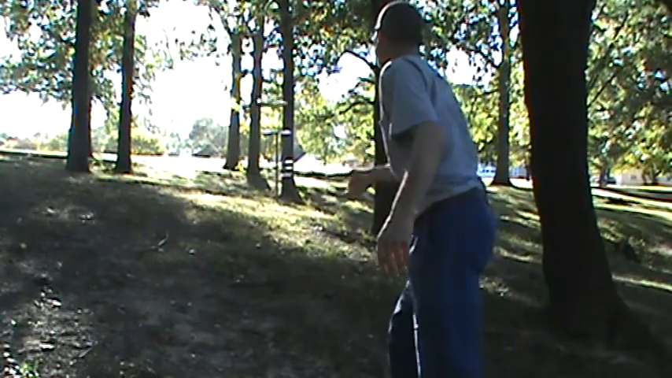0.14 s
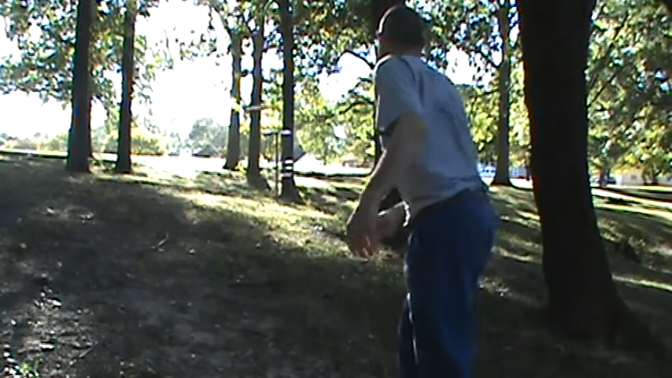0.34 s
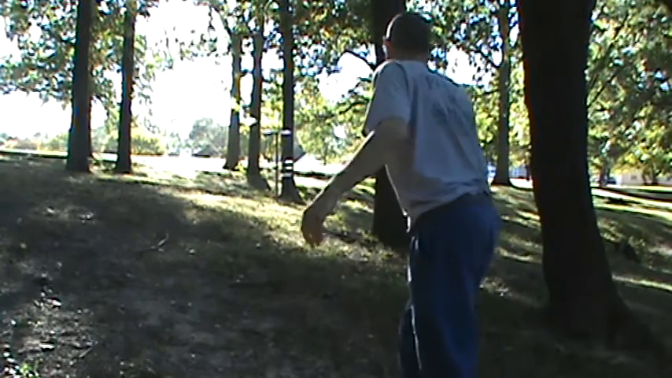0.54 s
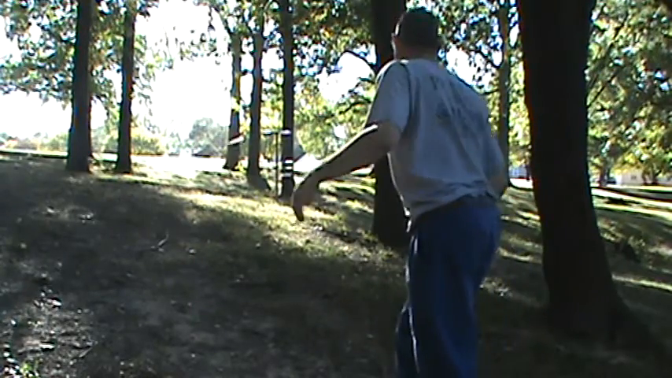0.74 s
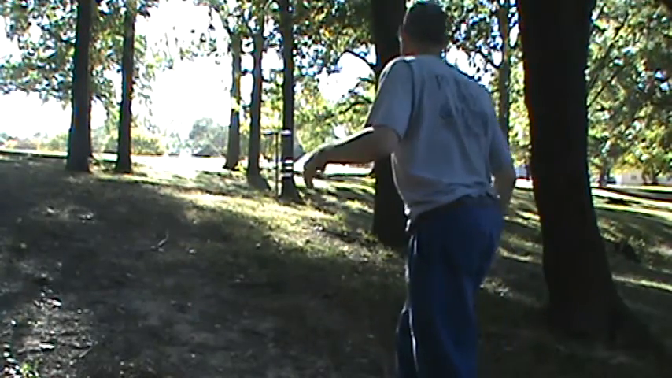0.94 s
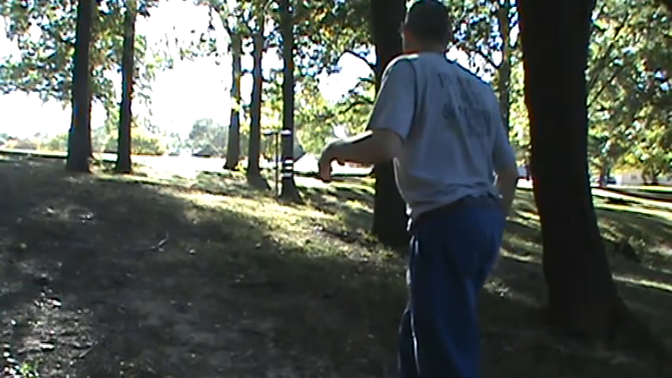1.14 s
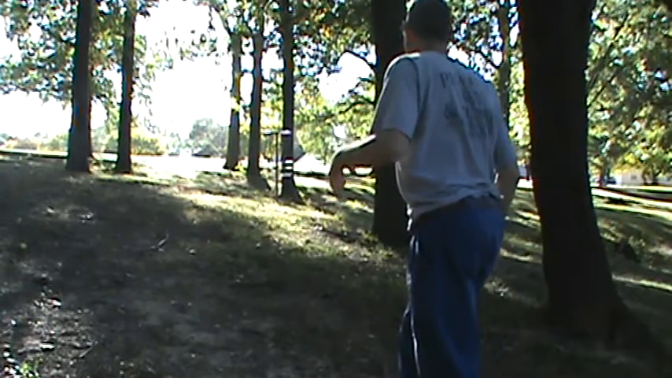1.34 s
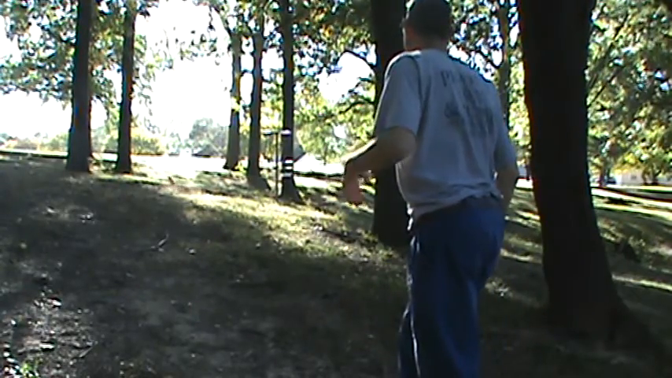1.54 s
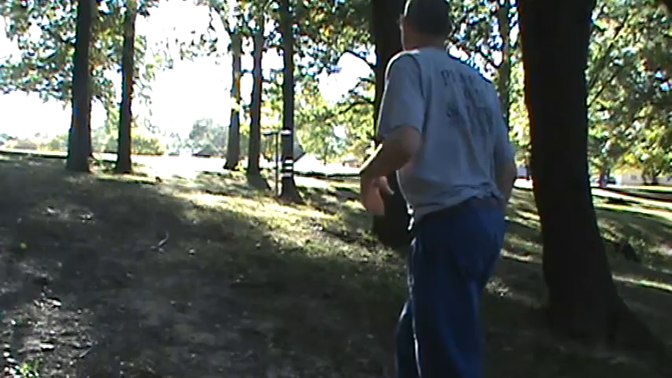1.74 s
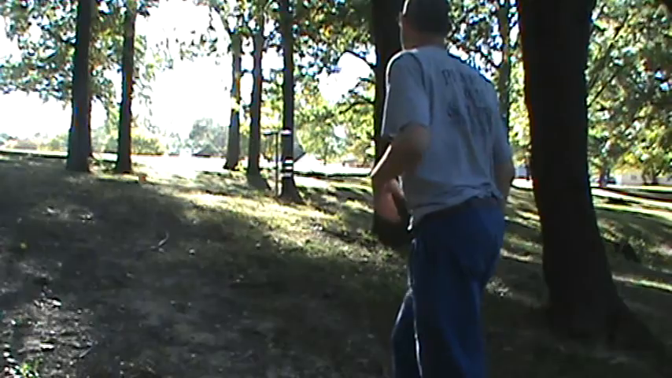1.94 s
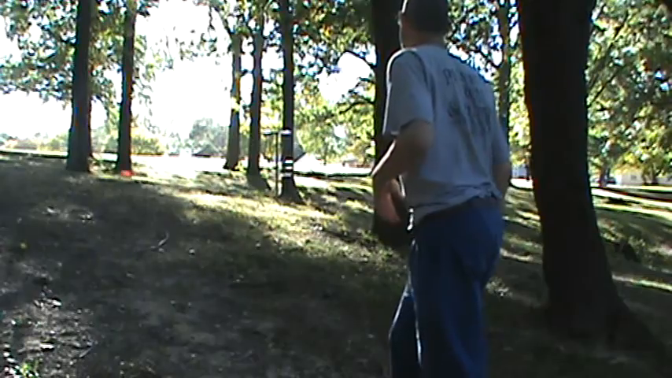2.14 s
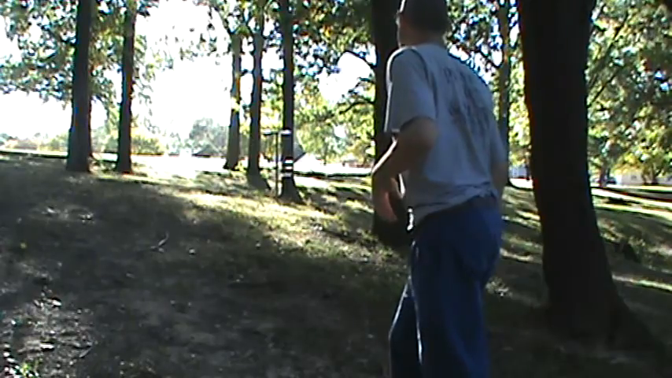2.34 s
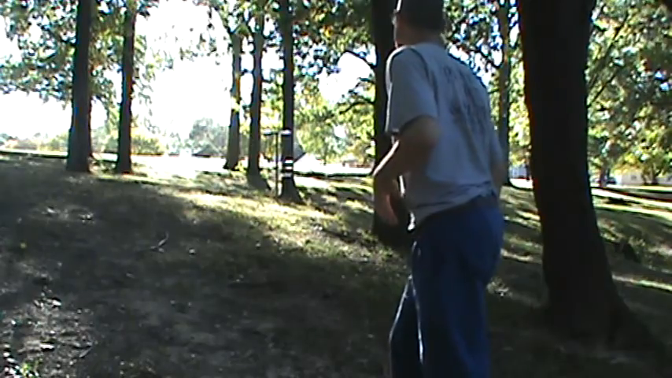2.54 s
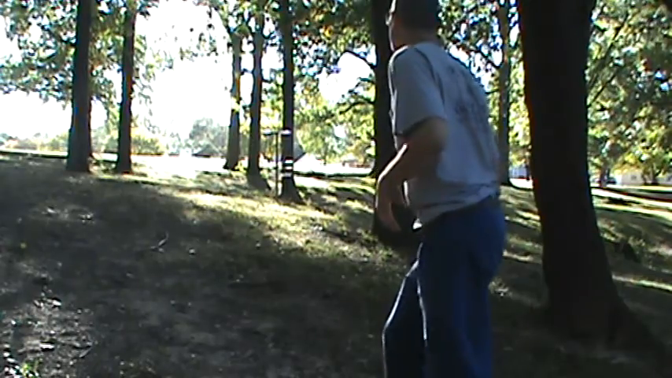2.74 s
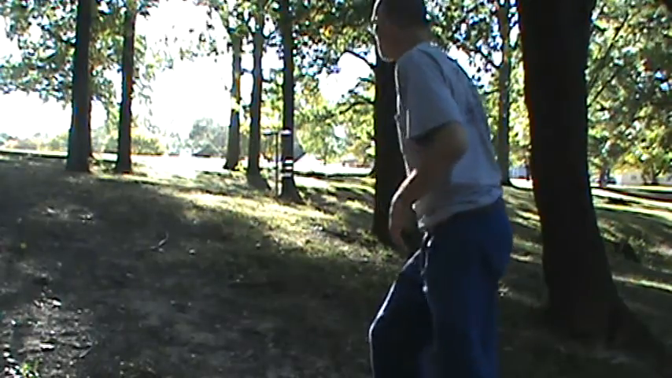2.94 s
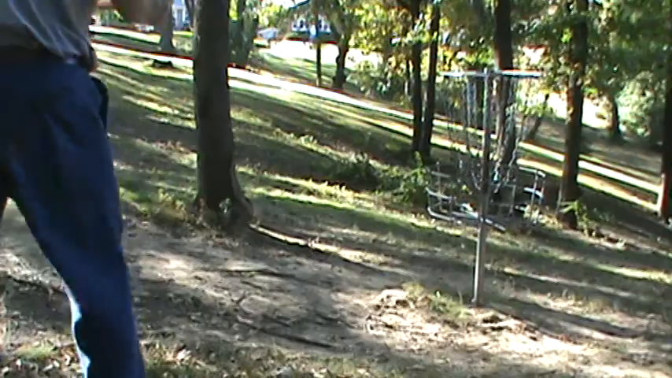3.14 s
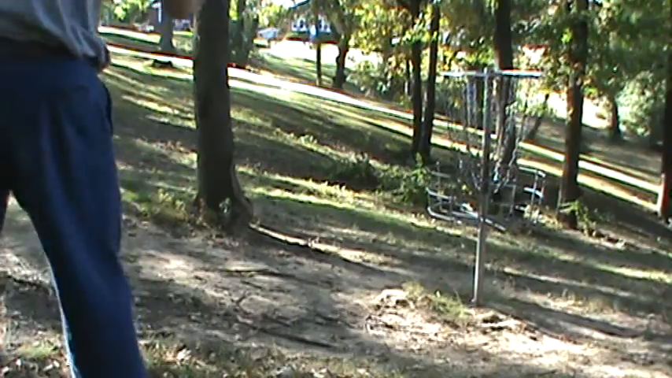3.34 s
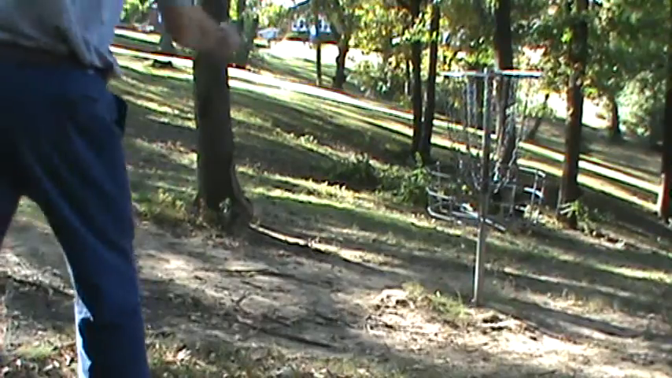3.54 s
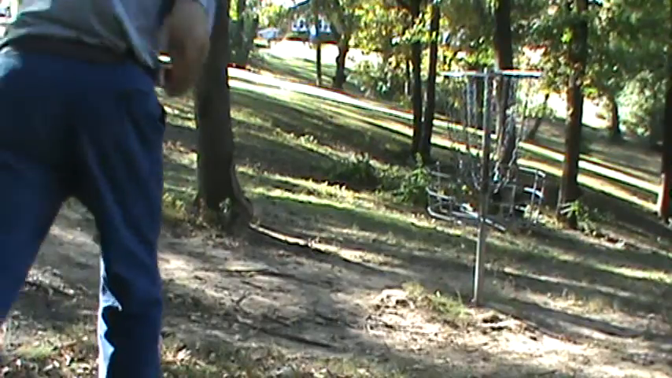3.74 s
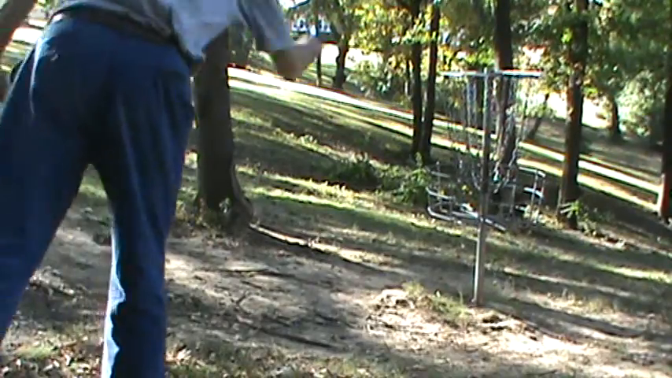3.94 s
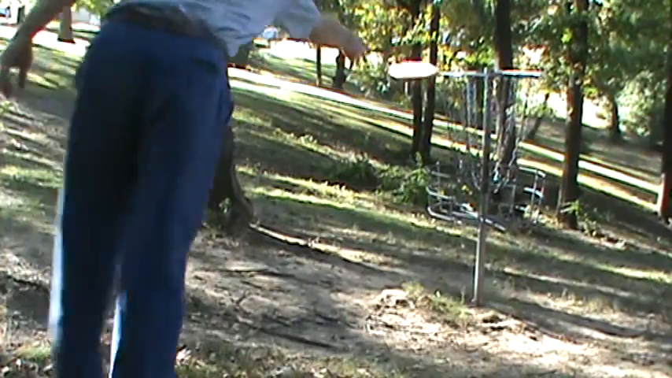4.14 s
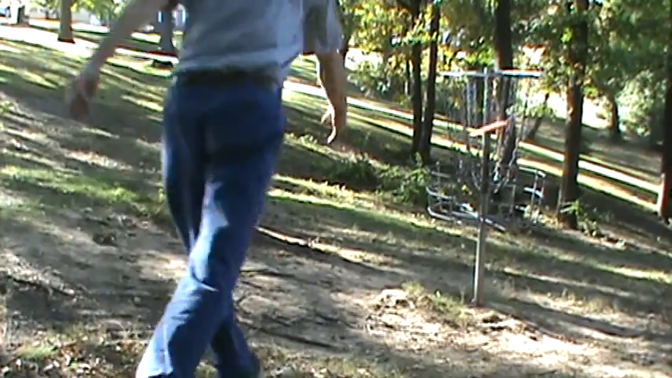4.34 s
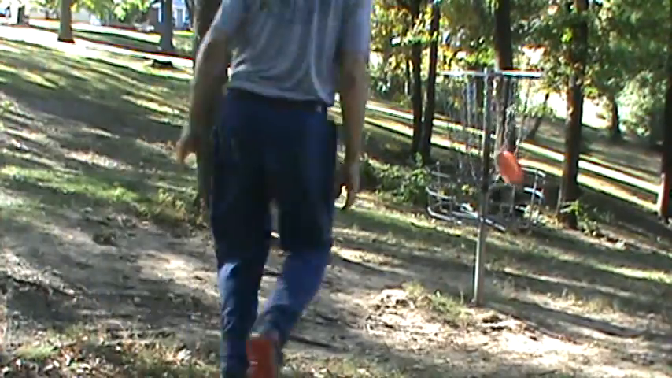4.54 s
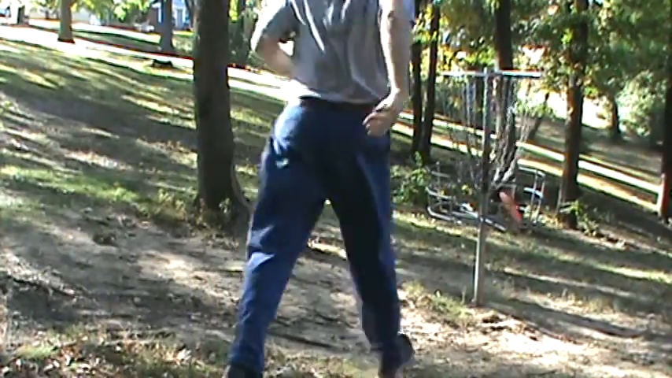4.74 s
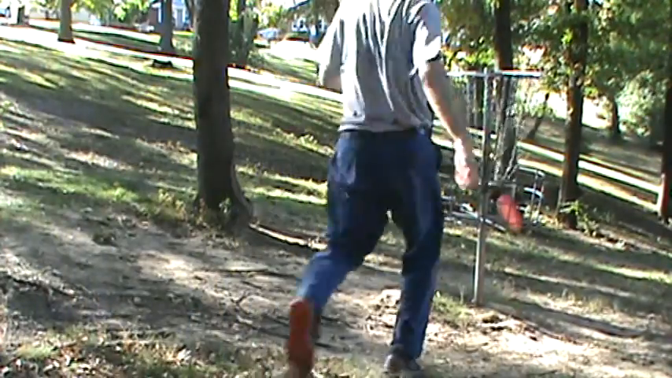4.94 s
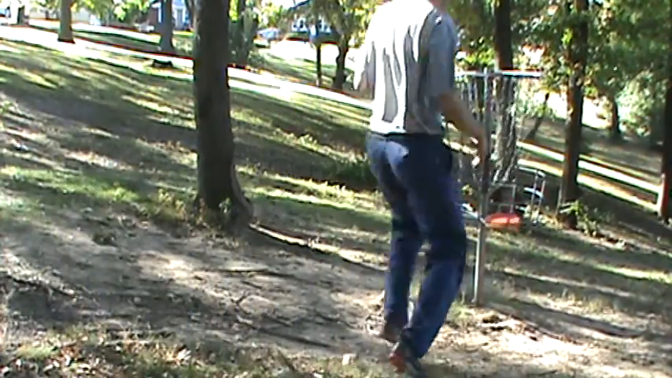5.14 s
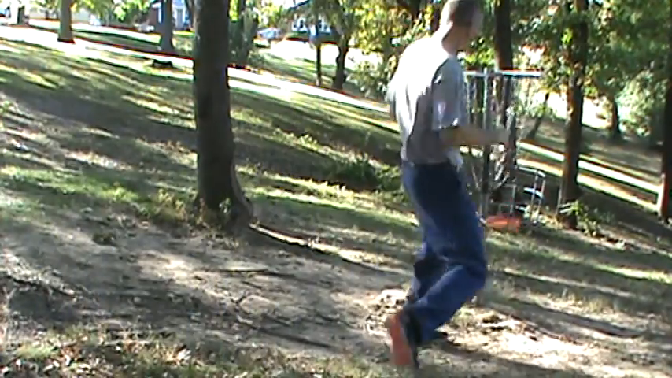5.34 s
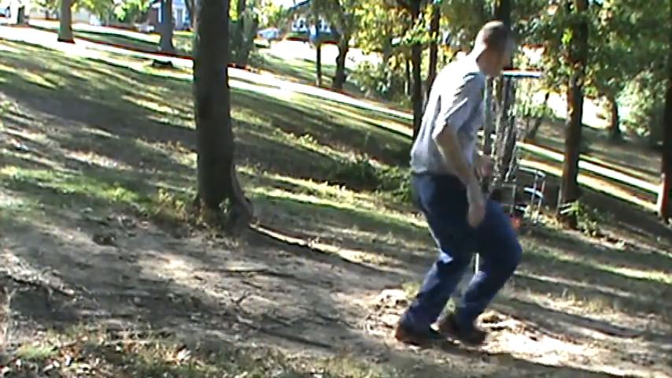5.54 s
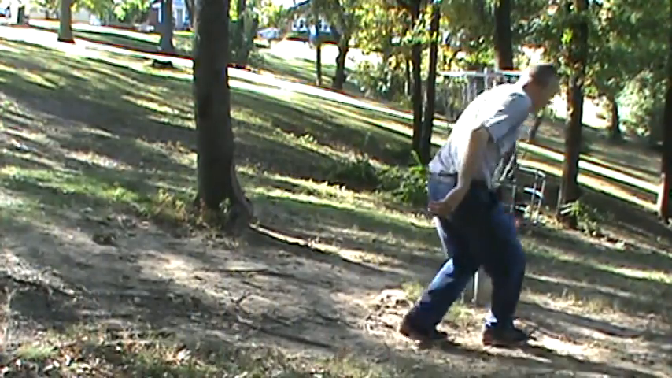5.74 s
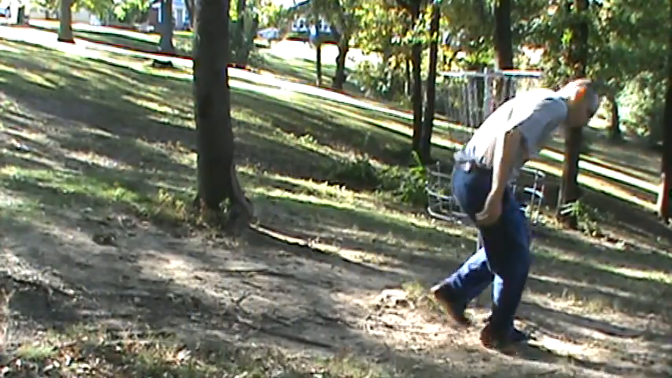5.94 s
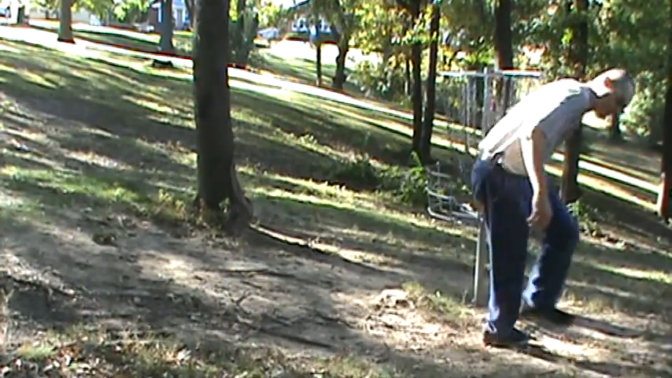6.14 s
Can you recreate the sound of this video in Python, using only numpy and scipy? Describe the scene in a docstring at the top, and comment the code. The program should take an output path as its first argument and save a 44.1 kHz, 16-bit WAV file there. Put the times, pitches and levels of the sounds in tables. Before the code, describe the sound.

Twigs snap sharply and dry leaves scuff under someone's shoes in a wooded park, over a steady distant roar and a faint engine. About halfway, a light breeze starts rumbling on the microphone. A plastic disc then slaps into the steel chains of a disc golf basket, which jangle brightly. The disc knocks a few more times and the swinging chains clink more softly as the footsteps move on.

```python
"""A putt in a wooded park. A distant roar and a far engine run throughout. First twigs snap and dry
leaves scuff under the player's shoes. At 3.1 s the level dips briefly and a breeze starts to rumble on
the microphone. At 4.45 s the disc slaps into the chains of a steel basket: light links tinkle first,
heavy links ring after them. The swinging chains clink a few more times as the player walks on."""
import sys
import numpy as np
from scipy import signal
from scipy.fft import rfft, irfft, next_fast_len
from scipy.io import wavfile

SR = 44100
rng = np.random.default_rng(int(sys.argv[2]) if len(sys.argv) > 2 else 0)


def put_to_file(sound):
    """Save the sound as 16-bit audio at rate SR, in the file named by the first command-line argument."""
    columns = np.atleast_2d(sound).T  # one column per channel
    safe = np.clip(columns, -1, 1)
    whole_steps = np.round(safe * 32767)
    wavfile.write(sys.argv[1], SR, whole_steps.astype(np.int16))


N = 277785
TIME_S = np.arange(N) / SR
DIP_S = 3.108


def gain(db):
    """dB to amplitude."""
    return 10 ** (np.asarray(db) / 20)


def unit_rms(x):
    """Scales to rms 1."""
    return x / np.sqrt(np.mean(x ** 2) + 1e-20)


def curve_at(points, hz):
    """Interpolates (f/Hz, value) rows over log frequency."""
    f, value = np.transpose(points)
    return np.interp(np.log(hz + 1), np.log(f + 1), value)


def add(mix, at_s, sound):
    """Mixes a sound in at at_s."""
    part = mix[max(round(at_s * SR), 0):][:len(sound)]
    part += sound[:len(part)]


def coloured(x, spectrum, tilt_db_oct=0):
    """Filters x by a tilted spectrum; rms 1."""
    size = next_fast_len(len(x))
    hz = np.fft.rfftfreq(size, 1 / SR)
    response = gain(curve_at(spectrum, hz) + tilt_db_oct * np.log2(hz + 1))
    return unit_rms(irfft(rfft(x, size) * response, size)[:len(x)])


def drift(per_s):
    """Slow random wander; rms 1."""
    return unit_rms(np.interp(TIME_S * per_s, np.arange(1000), rng.standard_normal(1000)))


def stereo_noise(spectrum, coherence, balance):
    """Noise with level, L/R coherence and balance set per frequency; rms 1."""
    size = next_fast_len(N)
    hz = np.fft.rfftfreq(size, 1 / SR)
    common, separate = rfft(rng.standard_normal((2, size)))
    shared = np.clip(curve_at(coherence, hz), -1, 1)
    lean_db = curve_at(balance, hz) / 2
    left = common * gain(lean_db)
    right = (shared * common + np.sqrt(1 - shared ** 2) * separate) * gain(-lean_db)
    return unit_rms(irfft(np.array([left, right]) * gain(curve_at(spectrum, hz)), size)[:, :N])


# Roar spectrum: f/Hz, density/dB
ROAR_SPECTRUM = [(15, -40), (25, -8), (113, -1.5), (164, -3.5), (246, -9.5), (281, -6.5), (313, -12),
                 (421, -12), (614, -11.5), (997, -11.5), (3000, -33), (5430, -37.5), (8810, -37.5),
                 (12500, -42), (15500, -41)]
# Roar L/R likeness: f/Hz, coherence
ROAR_COHERENCE = [(60, 1), (130, 1), (290, 0.96), (640, 0.84), (1410, 0.66), (3100, 0.2), (6820, 0.54),
                  (15000, 0.94)]
# Roar balance: f/Hz, L-R/dB
ROAR_LEAN = [(60, 1), (110, 0.5), (200, 0.5), (380, -0.5), (700, -3), (1290, -0.5), (2380, 1.5),
             (4400, -0.5), (8120, 1), (15000, 0.0)]


def roar(level_db=-36):
    """Distant, nearly steady low noise."""
    return gain(level_db + .5 * drift(9)) * stereo_noise(ROAR_SPECTRUM, ROAR_COHERENCE, ROAR_LEAN)


def engine(hz=82.5, level_db=-46):
    """Far engine: one tone, wandering in level and pitch."""
    envelope = gain(level_db + 1.7 * drift(11))
    cycles = np.cumsum(hz + 3 * drift(15)) / SR
    return envelope * unit_rms(np.sin(2 * np.pi * cycles))


# Breeze strength: t/s, level/dB
GUSTS = [(3.13, -33), (3.52, -29), (3.53, -24), (3.78, -29), (3.8, -23), (4.41, -30.5), (4.45, -39),
         (4.66, -26), (4.73, -39), (4.78, -28), (5.52, -32), (5.57, -40), (5.62, -28.5), (5.95, -26),
         (5.98, -32.5), (6.17, -38), (6.29, -24.5)]
# Buffeting spectrum: f/Hz, density/dB
BUFFET_SPECTRUM = [(20, -24), (45, -5.5), (75, -2), (150, -5), (230, -13), (290, -16.5), (380, -27.5),
                   (900, -36), (3000, -54)]


def breeze():
    """Gusts buffet the microphone from DIP_S on."""
    buffet = stereo_noise(BUFFET_SPECTRUM, coherence=[(60, .91), (140, .43), (260, -.3)],
                          balance=[(60, 0), (200, -.3)])
    return (TIME_S > DIP_S) * gain(np.interp(TIME_S, *np.transpose(GUSTS))) * buffet


def woods(x, t60_s=.067, taps_per_s=2000):
    """Trunks and ground scatter a thin, short echo, different on each side."""
    t = np.arange(SR // 2) / SR
    taps = rng.standard_normal((2, len(t))) * (rng.random((2, len(t))) < taps_per_s / SR)
    taps *= gain(-60 * t / t60_s)
    return signal.fftconvolve(x[None], taps / np.linalg.norm(taps[0]), axes=1)[:, :N]


# Spectrum of dry ticks, rustles and cracks: f/Hz, density/dB
CRACK_SPECTRUM = [(300, -17), (1000, -1.5), (2000, -1.5), (4000, -2), (7000, -0.5), (9500, 4.5),
                  (12000, -1), (15500, -11.5)]


def litter(ticks_per_s=22, spread_db=4):
    """Faint stray ticks from the dry ground."""
    onsets = rng.random(N) < ticks_per_s / SR
    sizes = .5 * gain(-40 + spread_db * np.minimum(rng.exponential(1, N), 3))
    t = np.arange(SR // 100) / SR
    tick = coloured(rng.standard_normal(len(t)), CRACK_SPECTRUM) * np.exp(-t / .0012)
    return signal.oaconvolve(onsets * sizes, tick / abs(tick).max())[:N]


# Dry rustling bursts: crest t/s, level/dB, rise/s, release/s, tilt/(dB/oct)
RUSTLE_BURSTS = [(.205, -31.5, 0.0035, 0.044, -0.7), (.318, -36.5, 0.019, 0.048, 1.5),
                 (1.32, -49, 0.088, 0.051, 1), (3.078, -41, .01, 0.014, 12), (3.22, -32, 0.079, .028, -2),
                 (3.461, -44, 0.41, 0.1, -5), (4.192, -38, 0.063, 0.019, -0.5),
                 (4.416, -28.5, 0.075, 0.031, 1.5), (4.495, -33, 0.029, 0.17, 1.3),
                 (4.8, -29, 0.043, 0.067, -2), (4.985, -26.5, 0.072, 0.069, 2),
                 (5.17, -40, 0.028, 0.22, -2.5), (5.355, -38.5, 0.023, 0.12, -5)]


def rustles(cracks_per_s=2500, spread_db=5.5, hiss=.41, roundness=1.17):
    """Swells of tiny cracks over hiss: shoe scuffs in leaves and, at 4.5 s, the chains' clatter."""
    out, t = np.zeros(N), np.arange(-SR // 3, SR // 2) / SR
    for at_s, db, rise_s, release_s, tilt_db_oct in RUSTLE_BURSTS:
        sizes = gain(spread_db * np.minimum(rng.exponential(1, len(t)), 3))
        cracks = sizes * rng.choice([-1, 1], len(t)) * (rng.random(len(t)) < cracks_per_s / SR)
        grain = unit_rms(cracks) + hiss * rng.standard_normal(len(t))
        swell = np.exp(-np.maximum(-t / rise_s, t / release_s) ** roundness)
        burst = gain(db) * swell * coloured(grain, CRACK_SPECTRUM, tilt_db_oct)
        add(out, at_s + t[0], burst[at_s + t >= 0])
    return out


# Feet shift, step into the putt, walk on: start t/s, end t/s
FOOTWORK_SPANS = [(.4, 2.1), (2.999, 4.3), (4.3, 5.45)]


def stalk_snaps(per_span=7, floor_db=-36, spread_db=10, centre_hz=7000, wood_db=-15):
    """Thin stalks break at random as the feet move; rows as in TWIG_SNAPS."""
    rows = []
    for start_s, end_s in FOOTWORK_SPANS:
        for k, (when, size, pitch) in enumerate(rng.random((per_span, 3))):
            at_s = start_s + (end_s - start_s) * (k + when) / per_span
            rows.append((at_s, floor_db + spread_db * size ** 2, centre_hz * 2 ** (pitch - .5), wood_db))
    return rows


# Twigs underfoot: t/s, peak/dB, ring f/Hz, wood knock re ring/dB
TWIG_SNAPS = [(.513, -19, 5500, -14), (0.5265, -4.5, 8500, -15), (.542, -10.5, 7750, -6.5),
              (.804, -27, 8050, -12), (0.871, -13, 7770, -16), (1.228, -16, 5250, -5),
              (1.325, -21, 8500, -24), (1.3556, -13, 8500, -23), (1.6, -15, 8600, -10),
              (3.203, -9.5, 6950, -9), (3.233, -8, 5240, -12), (3.475, -20.5, 3860, -14),
              (3.48, -16.5, 3200, -11), (3.393, -25, 6000, -15), (4, -27, 6200, -15),
              (4.196, -21, 8500, -16), (4.823, -20, 8100, -20), (5.16, -13, 8900, -31),
              (6.065, -22.5, 7100, -14)]


def twigs():
    """A sharp break rings a few cycles and splinters; thick twigs knock, thin ones crumble."""
    out, t = np.zeros(N), np.arange(SR // 30) / SR
    wood = np.sin(2 * np.pi * 1750 * t) * np.exp(-t / .00072)
    wood += .6 * np.sin(2 * np.pi * 4100 * t) * np.exp(-t / .00068)
    for at_s, peak_db, hz, wood_db in TWIG_SNAPS + stalk_snaps():
        ring = np.sin(2 * np.pi * hz * t) * np.exp(-t / .00028)
        burst = .14 * np.exp(-t / .00091)
        crumble = gain(-15 - .82 * (peak_db + 23)) * np.exp(-t / .0028)
        splinters = coloured(rng.standard_normal(len(t)), CRACK_SPECTRUM) * (burst + crumble)
        snap = ring + gain(wood_db) * wood + splinters
        add(out, at_s, gain(peak_db) * snap / abs(snap).max())
    return out


def struck(modes, t, pitch=1):
    """A struck body rings as a sum of damped sines."""
    return sum(gain(db - 60 * t / t60_s) * np.sin(2 * np.pi * hz * pitch * t) for hz, db, t60_s in modes)


# Basket frame modes: f/Hz, level/dB, t60/s
FRAME_MODES = [(790, -5, .09), (860, -2, .1), (960, -3, .09), (5550, -6, .07)]
# Plastic disc modes at pitch ratio 1: f/Hz, level/dB, t60/s
DISC_MODES = [(1067, -21.5, 0.048), (1890, -25, 0.047), (3350, -7, 0.014), (3760, -7.5, 0.019),
              (5550, -29, 0.02), (6250, -26, 0.016)]
# Knocks on pole and tray: t/s, peak/dB, pitch ratio, frame level/dB
DISC_KNOCKS = [(4.449, -5.5, 1.07, -48), (4.5, -29, 0.97, -29.5), (4.542, -35, 0.94, -30.5),
               (4.816, -13.5, 0.95, -40), (4.972, -13, 1.15, -54), (5.159, -18.5, 1.06, -43)]


def disc():
    """Each knock: a dry crack, a short ring of plastic, a hollow answer from the frame."""
    out, t = np.zeros(N), np.arange(SR // 8) / SR
    frame = struck(FRAME_MODES, t)
    for at_s, peak_db, pitch, frame_db in DISC_KNOCKS:
        noise = coloured(rng.standard_normal(len(t)), CRACK_SPECTRUM, tilt_db_oct=1.5)
        knock = struck(DISC_MODES, t, pitch) + .5 * noise * np.exp(-t / .0082)
        add(out, at_s, gain(peak_db) * knock / abs(knock).max() + gain(frame_db) * frame)
    return out


def free_links(modes, t, flurry_s, spread=.0015):
    """Free links ring on; no two are quite alike in pitch, so clashes beat unevenly."""
    hz, db, t60_s = np.transpose(modes)[:, :, None]
    onset, strength, phase = rng.random((3, len(hz), 1))
    link_hz = hz * (1 + spread * rng.uniform(-1.24, 1, hz.shape))
    age_s = t - flurry_s * onset ** 3
    envelope = gain(db + 4 * strength - 60 * np.maximum(age_s, 0) / t60_s) * (age_s > 0)
    return (envelope * np.sin(2 * np.pi * (link_hz * t + phase))).sum(0)


def pinched_links(modes, t, flurry_s, t60_s, detune, contacts=5):
    """Links pinched by neighbours ring mostly sharp and die fast; each rebound is weaker."""
    hz, db, _ = np.transpose(modes)[:, :, None]
    out, t = np.zeros(len(t)), t[:SR // 6]
    for k in range(contacts):
        bend, phase, weight = rng.standard_normal((3, len(hz), 1))
        bent_hz = hz * (1 + detune * (abs(bend) - .3))
        ring = (weight * gain(.8 * db) * np.sin(2 * np.pi * (bent_hz * t + phase))).sum(0)
        add(out, flurry_s * k / (contacts - 1), unit_rms(ring) * gain(-2 * k - 60 * t / t60_s))
    return out


def clash(modes, flurry_s, pinched_db, pinched_t60_s, detune, scrape_db):
    """Links collide over flurry_s and ring; sliding steel adds a rasp. First 25 ms at rms 1."""
    t = np.arange(int(max(t60_s for _, _, t60_s in modes) * SR)) / SR
    head = slice(SR // 40)
    free = free_links(modes, t, flurry_s)
    pinched = pinched_links(modes, t, flurry_s, pinched_t60_s, detune)
    rasp_spectrum = [(1200, -19), (3500, 7), (8500, -1), (11500, 13.5), (15500, -22)]
    scrape = gain(scrape_db) * coloured(rng.standard_normal(len(t)), rasp_spectrum) * np.exp(-t / .068)
    sound = free / free[head].std() + gain(pinched_db) * pinched / pinched[head].std() + scrape
    return sound / sound[head].std()


JANGLE_FLURRY_S, CLINK_FLURRY_S = .008, .004


def jangle(force, count, jitter_s=.002):
    """Rapid clashes as the disc ploughs through the chains; rows of t/s, level/dB."""
    at_s, db = np.transpose(force)
    times_s = np.linspace(at_s[0], at_s[-1], count) + jitter_s * rng.uniform(-.73, 1, count)
    return zip(times_s, np.interp(times_s, at_s, db))


# Light link modes: f/Hz, level/dB, t60/s
LIGHT_LINK_MODES = [(11770, -1, .17), (11881, 0, .21), (11936, -1, .25), (12053, -9, .19), (12234, -14, .2),
                    (12549, -12, .14), (12591, -9, .16), (12661, -8, .17), (12770, -14, .1)]
# Disc force on light chains (start, crest, end): t/s, clash level/dB
LIGHT_FORCE = [(4.453, -20.5), (4.512, -18.5), (4.66, -33.5)]
# Light chains swinging together: t/s, level/dB, rebound delay/s
LIGHT_SWINGS = [(4.702, -24, 0.015), (4.899, -34, 0.038), (5.043, -35, 0.034), (5.185, -35, 0.055),
                (5.251, -35, .028), (5.359, -37, 0.015), (5.503, -49.5, 0.005), (5.663, -38, 0.05),
                (5.945, -51, .005), (6.2, -52, .019)]


def light_chains(rebound_db=-.5):
    """Light links tinkle under the disc, then clink and rebound as they swing."""
    clashes = [(at_s, db, JANGLE_FLURRY_S) for at_s, db in jangle(LIGHT_FORCE, count=13)]
    for at_s, db, delay_s in LIGHT_SWINGS:
        clashes += [(at_s, db, CLINK_FLURRY_S), (at_s + delay_s, db + rebound_db, CLINK_FLURRY_S)]
    out = np.zeros(N)
    for at_s, db, flurry_s in clashes:
        tinkle = clash(LIGHT_LINK_MODES, flurry_s,
                       pinched_db=1, pinched_t60_s=.069, detune=.02, scrape_db=-12)
        add(out, at_s, gain(db) * tinkle)
    return out


# Disc force on heavy chains (start, crest, end): t/s, clash level/dB
HEAVY_FORCE = [(4.53, -23.5), (4.61, -20.5), (4.632, -26)]
# Heavy chains swinging together: t/s, upper level/dB, low drive/dB, rebound/dB
HEAVY_SWINGS = [(4.454, -29.5, -50, -3), (4.722, -31, -27.5, -2), (4.932, -24, -29, -20),
                (5.035, -34, -29.5, -8.5), (5.226, -30, -35, -23), (5.615, -36, -39, 0),
                (5.944, -33.5, -23.5, -7.5), (6.135, -41, -42, -18)]


def heavy_clashes(rebound_s=.043):
    """Jangle, then clinks that rebound once; rows of t/s, upper level/dB, low drive/dB, flurry/s."""
    rows = [(at_s, db, db - 5.5, JANGLE_FLURRY_S) for at_s, db in jangle(HEAVY_FORCE, count=7)]
    for at_s, upper_db, low_db, rebound_db in HEAVY_SWINGS:
        rows.append((at_s, upper_db, low_db, CLINK_FLURRY_S))
        rows.append((at_s + rebound_s, upper_db + rebound_db, low_db + rebound_db, CLINK_FLURRY_S))
    return rows


# Outer chains, lowest link modes: f/Hz, level/dB, t60/s
OUTER_MODES = [(2876, 0, .85), (2884, -8, .8), (2934, -8, .45), (3047, -17, .7)]
# Inner chains, lowest link modes: f/Hz, level/dB, t60/s
INNER_MODES = [(2852, 0, 1.1), (3040, -14, .9)]


def singing_links(clashes, waver_hz=4, flutter_db=2.2, inner_rest_s=5.5):
    """Clashes feed the lowest modes, which waver as the chains swing; the inner chains rest first."""
    out = np.zeros(N)
    for modes, rest_s in (OUTER_MODES, np.inf), (INNER_MODES, inner_rest_s):
        power = np.zeros(N)
        for at_s, _, low_db, flurry_s in clashes:
            if at_s < rest_s:
                size = int(flurry_s * SR)
                add(power, at_s, np.full(size, gain(low_db) ** 2 / size))
        for hz, db, t60_s in modes:
            energy = signal.lfilter([1], [1, -gain(-120 / (t60_s * SR))], power)  # leaky integrator
            cycles = np.cumsum(hz + waver_hz * drift(14)) / SR + rng.random()
            envelope = gain(db - 1 + flutter_db * drift(22)) * np.sqrt(energy)
            out += envelope * np.sin(2 * np.pi * cycles)
    return out


# Short low modes of heavy links held tight: f/Hz, level/dB, t60/s
HEAVY_TIGHT_MODES = [(2900, 0, .1), (3060, -3, .14), (3230, -7, .15), (3343, -10, .18), (3800, -14, .14),
                     (4097, -19, .2)]
# Upper modes of heavy links: f/Hz, level/dB, t60/s
HEAVY_UPPER_MODES = [(8005, -5, .36), (8035, 0, .38), (8119, -5, .22), (8181, -10, .25), (8263, -12, .25),
                     (8489, -11, .27), (8808, -7, .13), (9277, -8, .17), (9437, -14, .18), (9749, -15, .18),
                     (9905, -16, .18), (10131, -13, .2), (10260, -11, .16), (10420, -12, .18),
                     (13684, -16, .14), (15208, -17, .2)]


def heavy_chains():
    """Each clash of heavy links gives a short clank and a bright ring over the singing low modes."""
    clashes = heavy_clashes()
    out = singing_links(clashes)
    for at_s, upper_db, low_db, flurry_s in clashes:
        clank = clash(HEAVY_TIGHT_MODES, flurry_s,
                      pinched_db=-12.5, pinched_t60_s=.044, detune=.0496, scrape_db=-15)
        ring = clash(HEAVY_UPPER_MODES, flurry_s,
                     pinched_db=0, pinched_t60_s=.075, detune=.0266, scrape_db=-11.5)
        add(out, at_s, gain(low_db - 8.5) * clank)
        add(out, at_s, gain(upper_db) * ring)
    return out


def placed(x, lean_db, lead_samples=.35):
    """Spreads a source over two close microphone ports; the left leads."""
    shift = np.gradient(x) * lead_samples / 2
    return np.array([(x + shift) * gain(lean_db / 2), (x - shift) * gain(-lean_db / 2)])


def scene():
    """Basket and footsteps among the trees, over roar, engine and breeze."""
    basket = heavy_chains() + light_chains() + disc()
    crackle = twigs() + rustles() + litter()
    direct = placed(basket, lean_db=-.8) + placed(crackle, lean_db=-.4)
    echo = woods(gain(-13.5) * basket + gain(-25) * crackle)
    return direct + echo + roar() + engine() + breeze()


def record(dry, cutoff_hz=15900):
    """Brief 40 dB dip at DIP_S, then a low-pass."""
    dip = np.clip((abs(TIME_S - DIP_S) - .004) / .015, .1, 1) ** 2
    lowpass = signal.firwin(301, cutoff_hz, window=("kaiser", 8), fs=SR)
    return signal.oaconvolve(dry * dip, lowpass[None], "same")


dry = scene()
out = record(dry)
put_to_file(out)
```